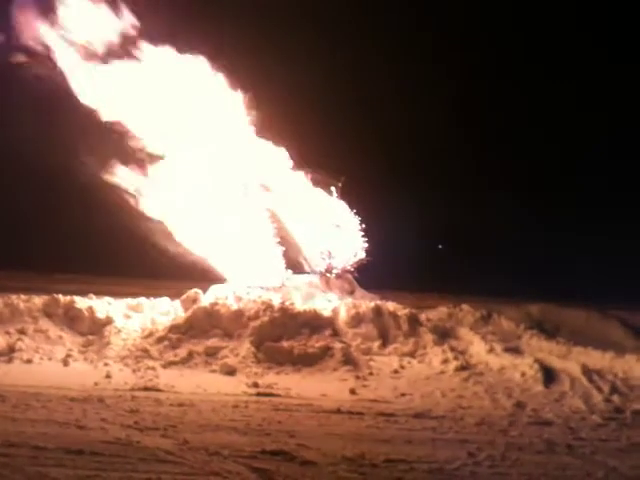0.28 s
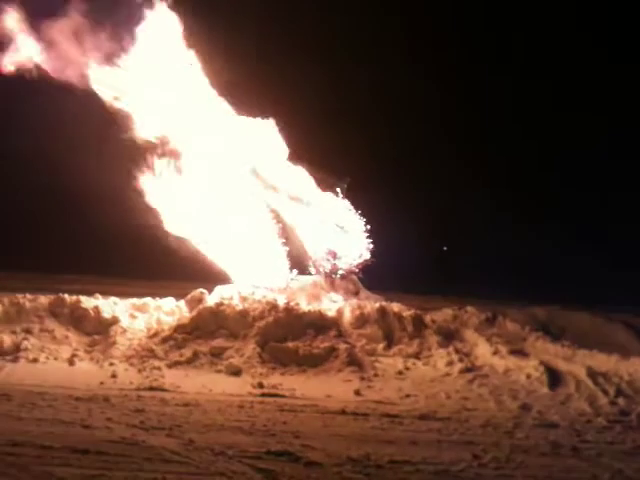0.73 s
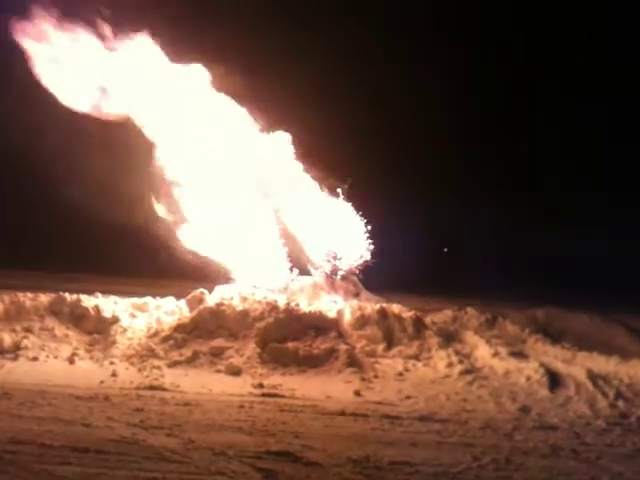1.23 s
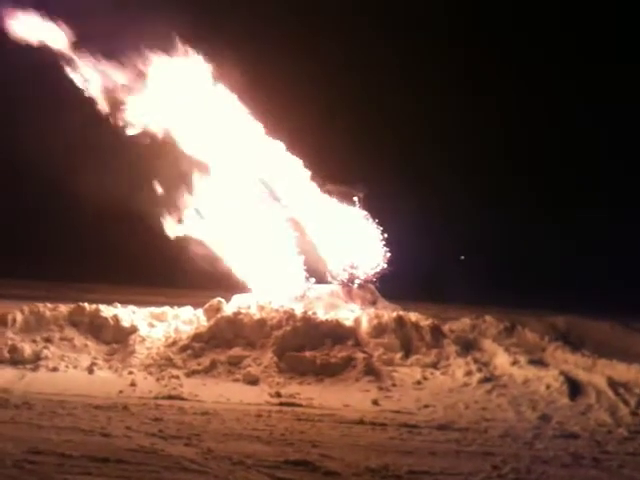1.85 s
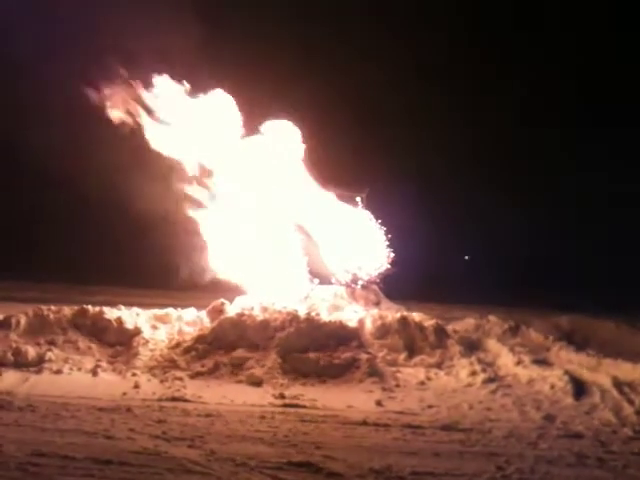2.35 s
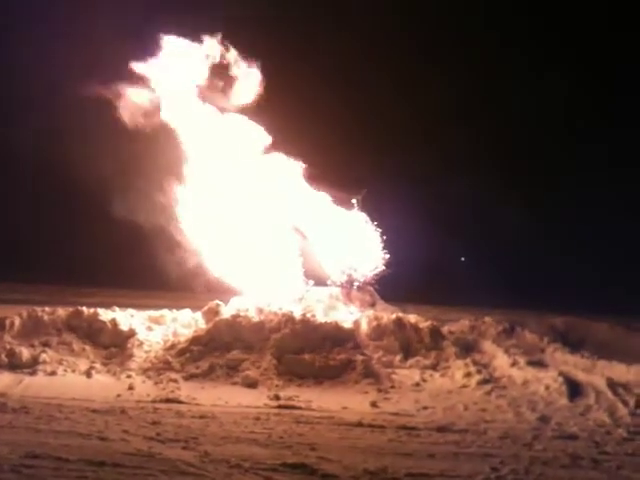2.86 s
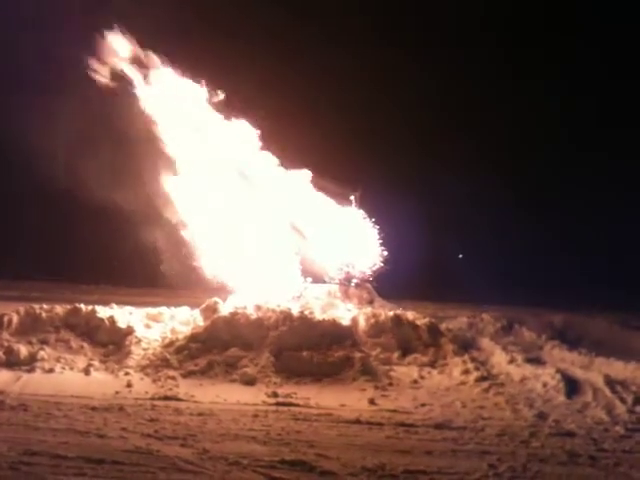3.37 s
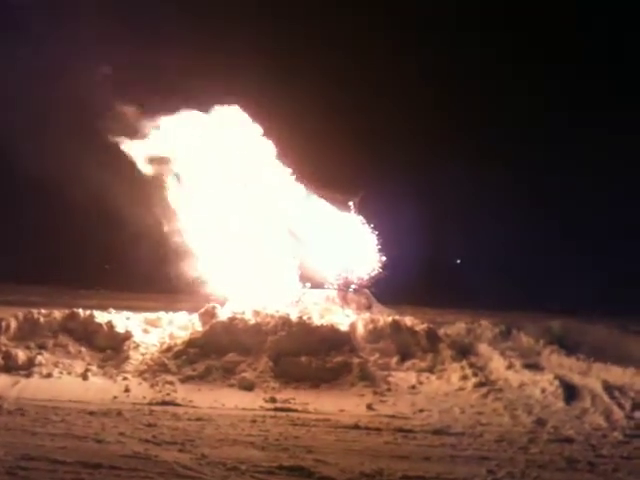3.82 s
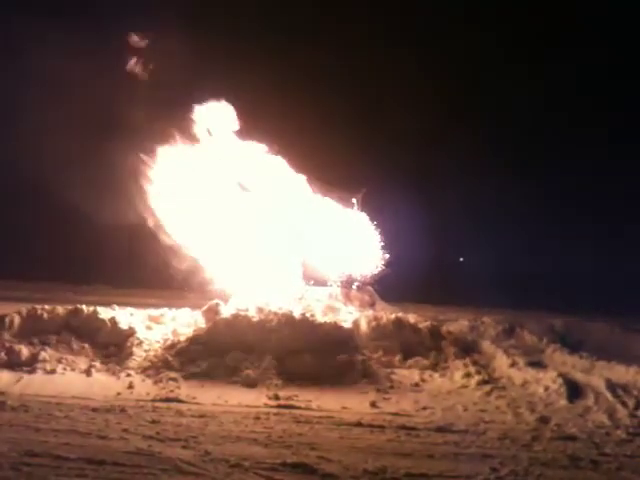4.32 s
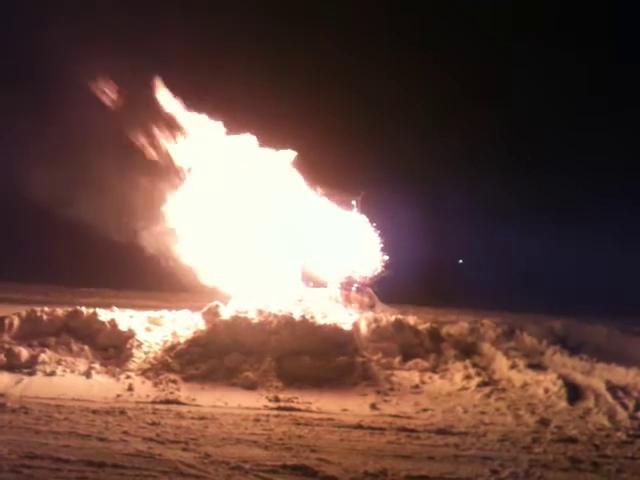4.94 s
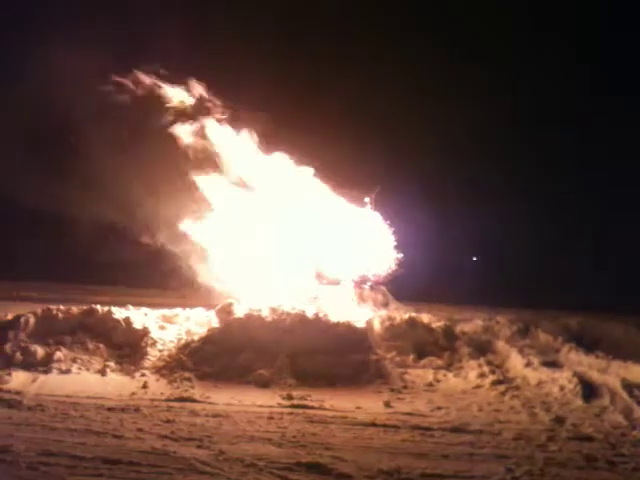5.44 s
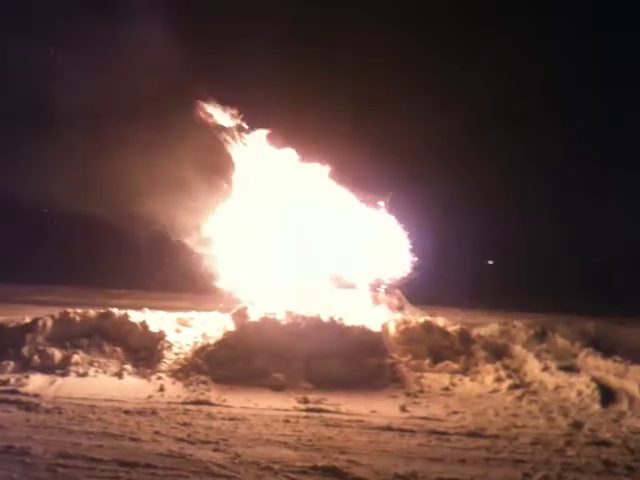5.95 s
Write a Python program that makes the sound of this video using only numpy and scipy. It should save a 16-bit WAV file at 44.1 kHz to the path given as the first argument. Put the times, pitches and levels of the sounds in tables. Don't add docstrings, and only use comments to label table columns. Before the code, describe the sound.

A large pile of trees burns in the open at night, heard from some distance through a small, bright microphone. From 0 s a thick, dry, sizzling crackle fills the sound: thousands of tiny snaps a second over a steamy hiss, strongest at the start and settling a little by 1 s. Sharper snaps leap out irregularly all along, some bright and needle-like, others duller with tiny woody pops; a strong one lands near 0.4 s, and clusters come around 1.6-1.9, 2.3-2.4 and 4.1-4.5 s, with another near 6 s. Brief shallow lulls make the texture flutter, notably around 3.4 s. Very faint soft gas puffs near 3.6 and 3.8 s are almost buried. Underneath, a quiet low flame roar slowly sinks and a soft rush of hot air weakens, especially after 5 s. The crackle thins slightly but continues to the end at about 6.2 s. Dry, no reverberation.

```python
import sys
import numpy as np
from scipy import signal
from scipy.fft import rfft, irfft
from scipy.io import wavfile
from scipy.ndimage import uniform_filter1d

SR = 44100
rng = np.random.default_rng(int(sys.argv[2]) if len(sys.argv) > 2 else 0)


def elevation(decibels):
    levels = np.asarray(decibels, float)
    return 10 ** (levels / 20)


def wrap_up_sound(samples):
    columns = np.atleast_2d(samples).T
    tamed = np.clip(columns, -1, 1)
    steps = np.round(tamed * 32767).astype(np.int16)
    wavfile.write(sys.argv[1], SR, steps)


N = 272535

# time in seconds, crackle level in dB.
BLAZE_VIGOUR = [(0.0, -37.5), (0.93, -40.5), (1.69, -40), (2.05, -40), (2.44, -39.5), (3.53, -40),
                (4.37, -38.5), (4.66, -41.5), (5.08, -40.5), (5.54, -41), (5.87, -41.5), (6.18, -40.5)]
# centre in seconds, length in ms, depth in dB.
CRACKLE_LULLS = [(0.152, 27, 6), (0.195, 13, 6), (0.287, 17, 6), (0.465, 30, 5), (0.565, 12.0, 4),
                 (0.609, 15, 15), (0.733, 15, 20), (0.796, 8, 18), (1.208, 30, 3.1), (1.272, 11, 7),
                 (1.503, 12, 7), (1.938, 7.0, 14), (2.001, 32, 8), (2.035, 37, 3), (2.368, 15, 8),
                 (2.53, 20, 1), (2.884, 13, 2.9), (2.968, 27, 2.5), (3.143, 19, 8), (3.275, 11, 8),
                 (3.442, 62, 9.5), (3.621, 48, 5.5), (4.047, 13.0, -1), (4.094, 53, 8), (4.143, 31, -1),
                 (4.346, 15, 10), (4.61, 21.0, 5), (4.708, 34, 4.1), (4.78, 45, 5), (5.041, 10, 8),
                 (5.088, 14.0, 8), (5.203, 8.4, 4), (5.237, 18, 5), (5.444, 50, 7), (5.51, 60, 5),
                 (5.595, 29, 6), (6.011, 14, 7), (6.091, 8.3, 19), (6.17, 26, 11)]
# frequency in Hz, level in dB per Hz.
BURST_COLOUR = [(100, -25), (1500, -22.5), (2800, -14.5), (3700, -7.5), (4600, -15), (5200, -6.5),
                (6200, -4), (7400, 1), (8800, -1), (10800, 1.5), (12000, -4), (13600, -4.5), (14800, -4.5),
                (15700, -13)]
# delay in ms, level in dB, sign.
BURST_ECHOES = [(.37, -8, -1), (1.3, -15, 1), (1.45, -13, -1), (1.9, -18, -1)]
# time in seconds, peak in dB, brightness in dB.
LOUD_SNAPS = [(0.1124, -19, 11.0), (1.0676, -21, 0.0), (1.292, -20, -1.0), (1.3505, -23, 1.0),
              (1.3741, -21, 5.0), (1.6186, -20, 11.0), (1.6579, -17, 5.0), (1.9102, -17, 8.0),
              (2.3569, -19, 8.0), (2.3845, -17, 11.0), (2.4329, -18, 5.0), (2.5405, -22, 10.0),
              (2.7549, -17, 0.0), (2.787, -20, 11.0), (3.0208, -18, 9.0), (3.0326, -20, 9.0),
              (3.3473, -19, -5.0), (3.7075, -19, 4.0), (3.7152, -21, -2.0), (4.1263, -17, 11.0),
              (4.1941, -22, 6.0), (4.2145, -20, 3.0), (4.2296, -22, 6.0), (4.2909, -21, -5.0),
              (4.2979, -18, -2.0), (4.475, -21, 0.0), (4.5057, -15, 1.0), (4.8027, -20, 5.0),
              (5.1052, -18, 0.0), (5.3818, -19, 11.0)]
# time in seconds, peak in dB, brightness in dB.
TWIG_BURSTS = [(0.0051, -24, 6), (0.0319, -25, 7), (0.0451, -23, 6), (0.0496, -26, 3), (0.0638, -27, 9),
               (0.072, -24, 6), (0.0747, -23, 1), (0.0778, -26, 2), (0.1028, -24, 4), (0.1171, -25, -1),
               (0.123, -25, 6), (0.1301, -25, 11), (0.1337, -26, 5), (0.22, -26, 3), (0.2757, -25, 5),
               (0.2983, -25, 10), (0.3274, -26, 2), (0.3594, -26, 3), (0.3999, -24, 1), (0.423, -22, 5),
               (0.4277, -24, 4), (0.4379, -23, -2), (0.4415, -26, 3), (0.4527, -26, 6),
               (0.4559, -23, 4), (0.4755, -25, 10), (0.4902, -26, 4), (0.5122, -26, 7),
               (0.5311, -25, 6), (0.5429, -25, 4), (0.5512, -26, 4), (0.5792, -26, 0), (0.6254, -23, 4),
               (0.6366, -24, 6), (0.6583, -24, 10), (0.6728, -25, 1), (0.7006, -23, -1),
               (0.7404, -26, 8), (0.7452, -25, 0), (0.7591, -25, 3), (0.7645, -26, 5), (0.8041, -26, 2),
               (0.8347, -24, 9), (0.8671, -25, 0), (0.8795, -26, 5), (0.8924, -25, 7),
               (0.9525, -22, 11), (0.9962, -23, 3), (1.0038, -24, 5), (1.0179, -23, 6),
               (1.0244, -25, -1), (1.0547, -26, 5), (1.0761, -23, 3), (1.0819, -25, 5),
               (1.1551, -26, 10), (1.1606, -23, 9), (1.1858, -26, 0), (1.1969, -26, -2),
               (1.2586, -26, 2), (1.2832, -26, 4),
               (1.2971, -25, 2), (1.3596, -26, 11), (1.364, -25, 2), (1.4378, -25, 11),
                   (1.4605, -22, 3), (1.4742, -25, 2), (1.4771, -26, 3), (1.4894, -23, 5), (1.4952, -26, 6),
                   (1.5211, -23, 3), (1.5249, -24, 0), (1.5675, -25, 10), (1.6031, -26, 10),
                   (1.6117, -26, 6), (1.6212, -26, -2), (1.6265, -26, 7), (1.6482, -23, 11),
                   (1.6547, -26, -1), (1.6756, -24, 10), (1.6861, -24, 3), (1.6894, -26, 11),
                   (1.7037, -21, 3), (1.7267, -24, 4), (1.7373, -26, 1), (1.7435, -25, 5),
                   (1.7652, -26, 10), (1.7697, -23, 5), (1.7929, -26, 1), (1.854, -23, 11),
                   (1.8601, -24, 1), (1.8627, -26, 6), (1.9133, -26, 8), (1.9275, -22, 11),
                   (1.9307, -25, 5), (1.9521, -26, -1), (2.0674, -26, 3), (2.0945, -26, -1),
                   (2.1549, -25, 3), (2.2002, -25, 5), (2.22, -23, 11), (2.2344, -25, 4), (2.2434, -25, 2),
                   (2.2465, -26, -2), (2.2555, -26, 2), (2.2585, -26, 3), (2.2993, -26, 10),
                   (2.303, -26, 8), (2.3154, -24, 4), (2.3307, -24, 1), (2.3335, -24, -4), (2.3496, -26, 2),
                   (2.3932, -26, 3), (2.4401, -25, 5), (2.4576, -23, -3), (2.4636, -23, 6),
                   (2.4802, -27, 3), (2.5016, -25, 4), (2.5082, -24, 4), (2.5609, -23, 5), (2.5712, -25, 8),
               (2.5737, -26, 6), (2.586, -26, 2), (2.64, -23, -1), (2.6425, -26, 3), (2.6956, -26, 3),
                   (2.7094, -26, 2), (2.7312, -26, 4), (2.7763, -23, 7), (2.7911, -26, 2), (2.8073, -26, 0),
                   (2.8139, -22, 10), (2.8388, -26, 5), (2.8549, -25, 9), (2.869, -26, 11),
                   (2.8759, -27, 11), (2.9574, -26, 2), (2.9973, -26, 9), (3.0124, -25, 7),
                   (3.0944, -26, 5), (3.1297, -25, 6), (3.1542, -26, 5), (3.2114, -25, 5), (3.2151, -25, 5),
                   (3.2177, -26, 0), (3.2282, -26, 6), (3.2321, -25, 11), (3.2949, -26, 4),
                   (3.3121, -26, -1), (3.3327, -25, 4), (3.3677, -25, 8), (3.5288, -26, 5),
                   (3.5811, -23, 5), (3.5849, -22, 6), (3.5908, -26, 11), (3.5992, -25, 9),
                   (3.6287, -26, 4), (3.6681, -25, 9), (3.6955, -25, 7), (3.8117, -26, 11),
                   (3.8197, -26, 7), (3.8869, -24, -2), (3.9271, -24, 6), (3.9308, -24, 3),
                   (3.9351, -26, 0), (3.9509, -25, 2), (3.9734, -22, 4), (3.9896, -27, 2), (3.9958, -24, 5),
                   (4.0024, -26, -2), (4.0058, -25, 0), (4.0235, -24, 8), (4.027, -26, 8), (4.034, -24, 8),
                   (4.0631, -27, 3), (4.1063, -26, 6), (4.1657, -26, 1), (4.1714, -23, 6), (4.1755, -26, 6),
                   (4.1903, -25, -1), (4.2052, -25, 5),
               (4.2217, -22, -1), (4.2391, -24, 6), (4.256, -26, 2), (4.2698, -23, 4), (4.2941, -25, 1),
                   (4.3009, -26, -1), (4.3161, -24, 3), (4.3543, -25, 7), (4.3568, -26, 7),
                   (4.3612, -24, 3), (4.4015, -26, 11), (4.4193, -26, 8), (4.434, -24, 2), (4.4658, -24, 1),
                   (4.4808, -24, 7), (4.4897, -24, 1), (4.5154, -26, 5), (4.519, -27, 3), (4.5572, -22, 3),
                   (4.595, -22, 2), (4.6264, -25, 3), (4.6331, -25, 11), (4.6471, -23, 2), (4.652, -26, -1),
                   (4.6921, -23, -4), (4.8424, -26, 1), (4.926, -23, 5), (4.988, -25, 7), (5.0215, -26, -5),
                   (5.1366, -26, 2), (5.1537, -24, -5), (5.2163, -25, 9), (5.3086, -22, 0),
                   (5.3725, -24, 3), (5.3868, -23, 1), (5.3924, -24, 1), (5.4312, -26, 5), (5.4634, -26, 1),
                   (5.6915, -26, -4), (5.7104, -25, 3), (5.7131, -26, 5), (5.7232, -26, -2),
                   (5.7266, -23, -1), (5.7326, -26, 8), (5.7553, -22, 4), (5.8414, -24, -3),
                   (5.8712, -24, 4), (5.8756, -26, 5), (5.8823, -26, 7), (5.922, -26, 2), (5.9466, -25, 11),
                   (5.958, -24, 2), (5.9693, -26, 7), (5.9934, -25, 5), (6.041, -26, 8), (6.0442, -19, 11),
                   (6.0544, -26, 2), (6.0703, -25, 11), (6.0742, -23, -4), (6.1161, -22, 1),
               (0.1879, -27, -2), (0.7851, -27, 7), (0.807, -27, 9), (0.8099, -27, 8), (0.9428, -27, 7),
               (0.9636, -27, 8), (1.0429, -27, 4), (1.2144, -27, 2), (1.2656, -27, 11), (1.3265, -28, 7),
               (1.4049, -28, 7), (1.7883, -27, 5), (1.9712, -27, 7), (2.0257, -28, 5), (2.1221, -27, -1),
               (2.158, -27, 5), (3.0591, -27, 2), (3.0705, -28, 6), (3.2897, -28, 8), (3.3184, -27, 4),
               (3.4083, -27, -1), (3.428, -29, 2), (3.4801, -28, 3), (3.5169, -27, 3), (3.5465, -27, 3),
               (3.6522, -27, 3), (3.7505, -28, 11), (3.7791, -27, 6), (4.5383, -27, 4), (4.582, -27, -4),
               (4.5998, -28, 6), (4.6729, -27, 8), (4.7487, -28, -2), (4.8329, -27, 4), (4.8778, -27, 0),
               (4.9593, -28, 10), (4.9757, -27, 4), (5.0785, -27, 7), (5.0812, -27, 7), (5.1916, -27, -2),
               (5.2439, -28, 2), (5.2721, -28, 10), (5.3304, -27, 6), (5.3544, -27, 0), (5.4571, -27, 7),
               (5.6044, -29, 6), (5.6535, -28, 4), (5.6586, -28, 4), (5.6966, -27, 2), (5.7804, -29, 8),
               (5.8447, -27, -2), (5.9089, -28, 5), (5.9187, -29, 7), (5.9529, -27, 5), (5.9998, -27, 0),
               (6.1357, -27, 8)]
# time in seconds, snap peak in dB, pop peak in dB, pop pitch in Hz.
THICK_TWIGS = [(0.0281, -27, -36, 2200.0), (0.04, -23, -40, 2700.0), (0.1736, -25, -31, 2500.0),
               (0.2403, -28, -37, 2800.0), (0.2524, -26, -36, 2400.0), (0.3757, -12, -52, 3000.0),
               (1.3773, -31, -40, 2300.0), (1.5511, -36, -41, 2700.0), (1.6731, -22, -39, 3000.0),
               (1.7002, -18, -37, 2700.0), (1.7342, -29, -36, 2700.0), (2.272, -17, -42, 2600.0),
               (2.2822, -25, -40, 2300.0), (2.4043, -25, -38, 2800.0), (2.5573, -28, -39, 2500.0),
               (3.1617, -26, -34, 2900.0), (3.5223, -24, -33, 2500.0), (4.2824, -22, -38, 2700.0),
               (4.3759, -21, -32, 2600.0), (4.8978, -33, -38, 2700.0), (5.055, -25, -40, 2200.0),
               (5.184, -22, -38, 2600.0), (5.5614, -25, -38, 2400.0), (6.1086, -20, -39, 3000.0)]
# time in seconds, peak in dB, pitch in Hz.
GAS_PUFFS = [
    (3.635, -53.5, 255),
    (3.762, -54, 194),
]
# frequency in Hz, level in dB per Hz.
ROAR_COLOUR = [(45, -58), (65, -19), (110, -6), (170, 1.5), (260, -5), (400, -17), (700, -31)]
# frequency in Hz, level in dB per Hz.
RUSH_COLOUR = [(100, -29), (400, -5.5), (660, 1.5), (900, -4.5), (1240, -9), (1700, -3), (2100, -9),
               (2400, -2), (2800, -10.5), (4000, -10)]
# time in seconds, rush level in dB.
DRAUGHT_LEVEL = [
    (0.0, -54),
    (0.5, -55.5),
    (3.3, -57.5),
    (4.1, -57.5),
    (4.9, -56),
    (5.3, -61),
    (6.18, -58.5),
]
# frequency in Hz, level in dB per Hz.
GUST_COLOUR = [(15, -1), (30, 18), (55, 13), (80, 18), (150, -19)]
# centre in Hz, width in Hz, gain in dB.
COLOUR_PEAKS = [(2820, 67, -9.5), (3450, 280, -7.5), (4616, 530, 8), (5070, 120, -5.5), (8024, 960, 5.5),
                (10250, 250, 0), (11500, 420, 1)]
# time in seconds, centre of the thin zone in Hz, depth in dB, loss of top in Hz.
TREBLE_THINNING = [(0, 13200, 2, 300), (1.0, 13100, 2.5, 220), (1.15, 15200, 4.5, 120),
                   (1.5, 15200, 3, 120), (1.9, 13500, 1, 150), (2.4, 13950, 4, 30), (3.5, 14000, 5.5, 20),
                   (6.18, 14050, 6.5, 0)]
# low edge in Hz, high edge in Hz, threshold in dB re band mean.
THINNED_BANDS = [(4950, 5500, -6), (2650, 3000, -8)]

PLACES = 18
TOP_HZ = 15770
SCATTER_MS, SCATTER_DB = .4, -11
LULL_SCALE, LULL_WIDTH = 0.37, 0.82
SNAP_THIN_HZ, SNAP_THIN_SHARE, SNAP_TOP_HZ = 4600, .6, 14500
THICK_BRIGHT_DB = 1
POP_CUT_HZ, POP_RAISE, KNOCK_RAISE = 1100, 1.3, 1.5
PUSH_DB, PUSH_LOW_HZ, PUSH_HIGH_HZ = -24, 1900, 3400
ROAR_DB, ROAR_FALL_DB_PER_S = -62, 0.28
SUDDEN_DB, SUDDEN_S = 4.7, .03


def in_time(rows):
    s, *columns = np.transpose(rows)
    t = np.arange(N) / SR
    return [np.interp(t, s, column) for column in columns]


def rms_one(x):
    return x / np.sqrt(np.mean(x ** 2) + 1e-20)


def drift(rate_hz):
    r = np.exp(-2 * np.pi * rate_hz / SR)
    noise = rng.standard_normal(N + SR)
    return rms_one(signal.lfilter([1], [1, -2 * r, r * r], noise)[SR:])


def causal(points, tilt_db=0, size=2048):
    hz = np.maximum(np.fft.rfftfreq(size, 1 / SR), 1)
    point_hz, point_db = np.transpose(points)
    level_db = np.interp(np.log(hz), np.log(point_hz), point_db)
    octaves = np.clip(np.log2(hz / 8300), -.3, .3)
    treble_only = np.clip(hz / 1500 - 3, 0, 1)
    level_db = level_db + tilt_db * octaves * treble_only
    cepstrum = irfft(np.log(elevation(level_db)))
    cepstrum[1:size // 2] *= 2
    cepstrum[size // 2 + 1:] = 0
    return np.exp(rfft(cepstrum))


def burst(tilt_db, stretch):
    colour = causal(BURST_COLOUR, tilt_db)
    w = 2 * np.pi * np.linspace(0, SR / 2, len(colour))
    paths = 1
    for ms, db, sign in BURST_ECHOES:
        delay_s = ms * stretch ** ms / 1000
        paths = paths + np.sign(sign) * elevation(db) * np.exp(-1j * w * delay_s)
    t_ms = np.arange(len(colour) * 2 - 2) / SR * 1000
    scatter = elevation(SCATTER_DB) * rng.standard_normal(len(t_ms)) * np.exp(-t_ms / SCATTER_MS)
    scatter[0] = 1
    scattered = colour * rfft(scatter) / np.sqrt(np.sum(scatter ** 2))
    clean_peak = np.max(np.abs(signal.hilbert(irfft(colour))))
    return irfft(scattered * paths)[:512] / clean_peak


def lulls():
    t = np.arange(N) / SR
    sunk_db = np.zeros(N)
    for s, ms, db in CRACKLE_LULLS:
        width_s = LULL_WIDTH * ms / 1000
        sunk_db -= LULL_SCALE * db * np.exp(-((t - s) / width_s) ** 2)
    return sunk_db


def flurry(loud, width_ms, gain_db):
    s, peak_db, _ = np.transpose(loud)
    power = np.zeros(N)
    np.add.at(power, (s * SR).astype(int), elevation(2 * (peak_db + gain_db)))
    t_ms = np.arange(-600, 601) / SR * 1000
    steepness = np.where(t_ms < 1, 2, 1)
    shape = np.exp(-np.abs(t_ms - 1) / width_ms * steepness)
    return np.abs(signal.oaconvolve(power, shape, "same"))


def crackle(loud, crackle_db, per_s, spread_db, clump_db, top_db, hiss_db):
    clumps = elevation(clump_db * (0.41 * drift(22) + drift(45) + 1.1 * drift(150)))
    born = rng.random(N) < per_s * clumps / SR
    sizes = elevation(np.minimum(spread_db * rng.exponential(1, N), top_db))
    dealt = rng.integers(0, PLACES, N)
    signs = rng.choice([1, 1, -1], N)
    hiss = elevation(hiss_db) * rng.standard_normal(N)
    clicks = rms_one(born * sizes * signs) + hiss
    tilts_db = np.linspace(-12.0, 12.0, PLACES)
    stretches = np.linspace(1.08, .92, PLACES)
    out = np.zeros(N)
    for place in range(PLACES):
        snap = burst(tilts_db[place], stretches[place])
        out += signal.oaconvolve(clicks * (dealt == place), snap)[:N]
    power = elevation(2 * crackle_db) + flurry(loud, width_ms=2.0, gain_db=-21.5)
    return np.sqrt(power) * rms_one(out)


def twigs():
    return np.array(TWIG_BURSTS)


def snaps(loud, gain_db, lead_s, dull_db, bright_db):
    s, peak_db, bright = np.transpose(loud)
    at = ((s - lead_s) * SR).astype(int)
    share = np.clip((bright + 5) / 16, 0, 1)
    out = np.zeros(N)
    for place, stretch in enumerate(np.linspace(1.05, .95, PLACES)):
        here = np.arange(len(s)) % PLACES == place
        for tilt_db, part in ((dull_db, 1 - share), (bright_db, share)):
            clicks = np.zeros(N)
            np.add.at(clicks, at, here * np.sqrt(part) * elevation(peak_db + gain_db))
            out += signal.oaconvolve(clicks, burst(tilt_db, stretch))[:N]
    thin = signal.sosfilt(signal.butter(1, SNAP_THIN_HZ, "high", fs=SR, output="sos"), out)
    soft = signal.butter(2, SNAP_TOP_HZ, fs=SR, output="sos")
    return signal.sosfilt(soft, out + SNAP_THIN_SHARE * (thin - out))


def blips(rows, cycles, gain_db):
    out = np.zeros(N + SR)
    for s, db, hz in rows:
        t = np.arange(int(3 * cycles / hz * SR)) / SR
        age = t * hz / cycles * 3
        start = int((s - cycles / hz / 3) * SR)
        swell = age * np.exp(1 - age)
        out[start:start + len(t)] += elevation(db + gain_db) * swell * np.sin(2 * np.pi * hz * t)
    return out[:N]


def pops(small):
    s, peak_db, bright_db = np.transpose(small)
    push_hz = rng.uniform(PUSH_LOW_HZ, PUSH_HIGH_HZ, len(small))
    pushes = np.column_stack([s, peak_db + PUSH_DB - bright_db, push_hz])
    thick = np.array(THICK_TWIGS)[:, [0, 2, 3]]
    out = blips(thick * [1, 1, POP_RAISE], cycles=.7, gain_db=2.5)
    out += blips(thick * [1, 1, KNOCK_RAISE], cycles=1.6, gain_db=0)
    out += blips(pushes, cycles=.7, gain_db=0)
    return signal.sosfilt(signal.butter(2, POP_CUT_HZ, "high", fs=SR, output="sos"), out)


def turbulence(points, level_db, flicker_db):
    run_in = 8192
    noise = rng.standard_normal(N + run_in)
    coloured = signal.fftconvolve(noise, irfft(causal(points, size=run_in)))[run_in:N + run_in]
    return elevation(level_db + flicker_db * drift(21.0)) * rms_one(coloured)


def flame_roar():
    roar_db = ROAR_DB - ROAR_FALL_DB_PER_S * np.arange(N) / SR
    return turbulence(ROAR_COLOUR, roar_db, flicker_db=1.54)


def hot_air_rush():
    rush_db, = in_time(DRAUGHT_LEVEL)
    return turbulence(RUSH_COLOUR, rush_db, flicker_db=2.0)


def gusts():
    return turbulence(GUST_COLOUR, level_db=-93, flicker_db=8)


def gas_puffs():
    return blips(GAS_PUFFS, cycles=3.3, gain_db=5.5)


def scene():
    blaze_db, = in_time(BLAZE_VIGOUR)
    crackle_db = blaze_db + lulls() - .6
    small = twigs()
    thick = [(s, db, THICK_BRIGHT_DB) for s, db, _, _ in THICK_TWIGS]
    loud = np.vstack([LOUD_SNAPS, thick, small])
    fire = crackle(loud, crackle_db, per_s=2600, spread_db=5.5, clump_db=1.94, top_db=5.5, hiss_db=-6.0)
    fire = fire + snaps(loud, gain_db=2.3, lead_s=.00008, dull_db=-14, bright_db=10)
    fire = fire + pops(small) + gas_puffs()
    air = flame_roar() + hot_air_rush() + gusts()
    return (fire + air)[None]


def microphone(x):
    for hz, width_hz, db in COLOUR_PEAKS:
        w, a = 2 * np.pi * hz / SR, elevation(db / 2)
        q = np.sin(w) * width_hz / hz / 2
        turn = -2 * np.cos(w)
        x = signal.lfilter([1 + q * a, turn, 1 - q * a], [1 + q / a, turn, 1 - q / a], x)
    return x


def thin_treble(x, from_hz, zone_hz, under_db, waver_db, edge_share, size=2048):
    hz, s, frames = signal.stft(x, SR, nperseg=size)
    power = uniform_filter1d(np.abs(frames) ** 2, size=3, axis=0)
    at = np.minimum((s * SR).astype(int), N - 1)
    centre_hz, depth_db, loss_hz = (curve[at] for curve in in_time(TREBLE_THINNING))
    edge_hz = TOP_HZ - edge_share * loss_hz * np.clip(1 + drift(6)[at] / 2, 0, 2)
    zone_db = depth_db * np.exp(-((hz[:, None] - centre_hz) / zone_hz) ** 2)
    top = (hz > from_hz) & (hz < TOP_HZ)
    limit_db = under_db + zone_db + waver_db * drift(8.1)[at]
    limit = elevation(2 * limit_db) * np.mean(power[top], axis=0)
    weak = (power < limit) & top[:, None]
    weak = weak | (hz[:, None] >= edge_hz)
    for low_hz, high_hz, db in THINNED_BANDS:
        band = (hz > low_hz) & (hz < high_hz)
        smooth = uniform_filter1d(power[band], size=size // 256, axis=0)
        weak[band] = smooth < elevation(2 * db) * np.mean(power[band])
    return signal.istft(frames * ~weak, SR, nperseg=size)[1][:N]


def sudden(x):
    power = x ** 2
    jump = uniform_filter1d(power, size=128) > elevation(2 * SUDDEN_DB) * uniform_filter1d(power, size=2048)
    near = uniform_filter1d(jump * 1., size=int(SUDDEN_S * SR)) > 1e-6
    return uniform_filter1d(near * 1., size=256)


def roll_off(x):
    return signal.sosfilt(signal.butter(12, 16720, fs=SR, output="sos"), x)


def record(dry):
    heard = microphone(dry[0])
    slow = thin_treble(heard, from_hz=12900, zone_hz=300, under_db=-2.7, waver_db=1.6, edge_share=1)
    quick = thin_treble(heard, from_hz=12600, zone_hz=150, under_db=-.8, waver_db=1.5, edge_share=0, size=256)
    thin = slow + sudden(heard) * (quick - slow)
    below_top = np.fft.rfftfreq(N, 1 / SR) < TOP_HZ + 80
    mix = irfft(rfft(thin) * below_top, N)[None]
    return roll_off(mix)


dry = scene()
out = record(dry)
wrap_up_sound(out)
```